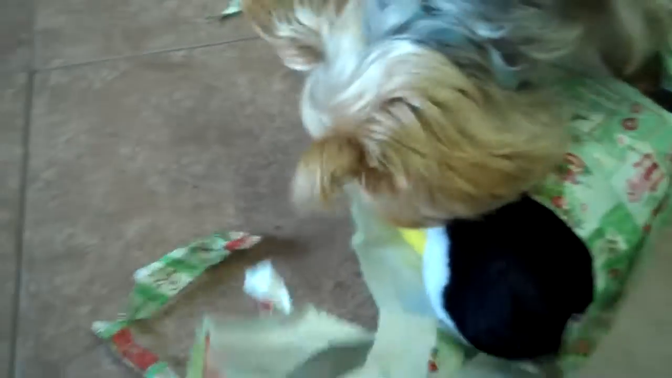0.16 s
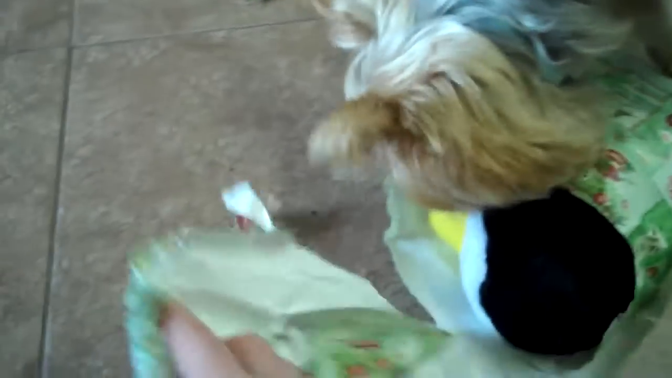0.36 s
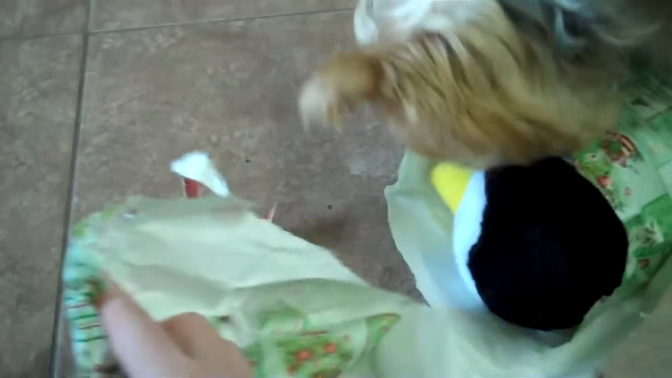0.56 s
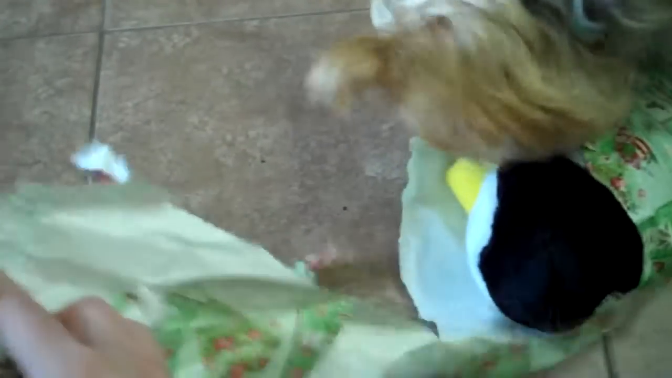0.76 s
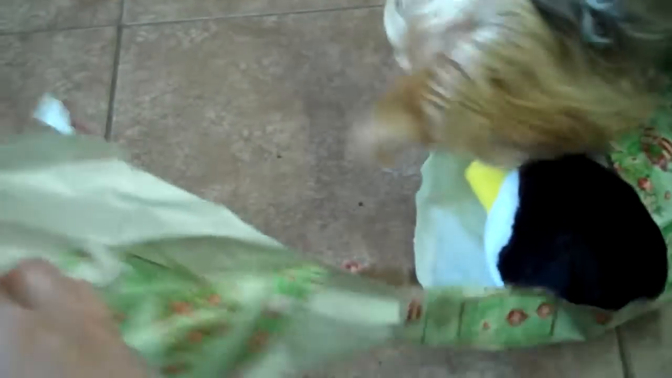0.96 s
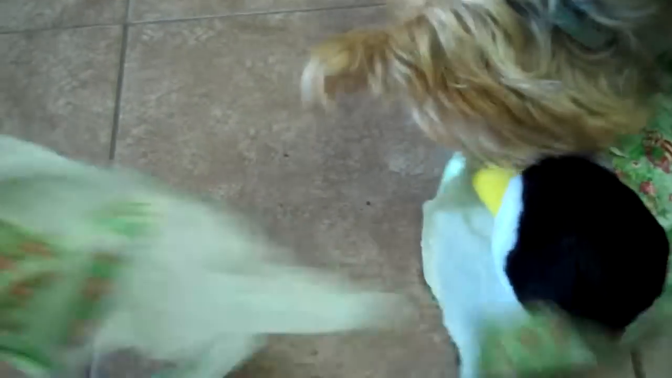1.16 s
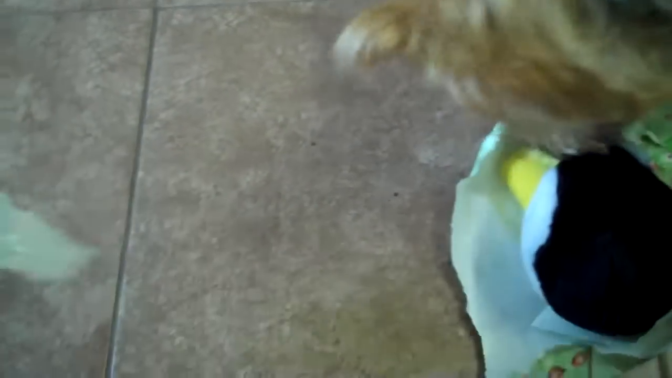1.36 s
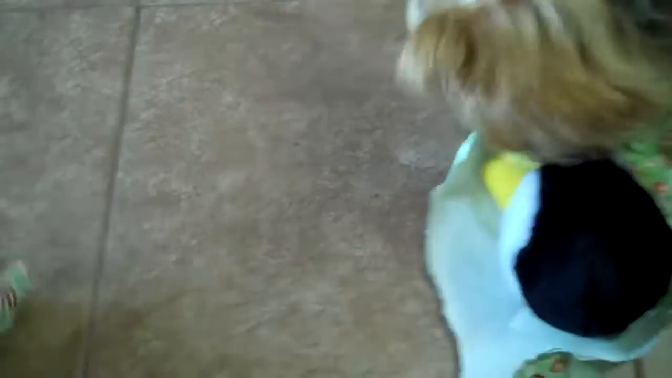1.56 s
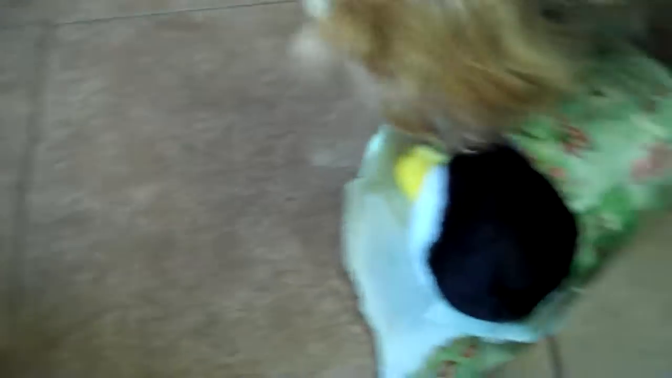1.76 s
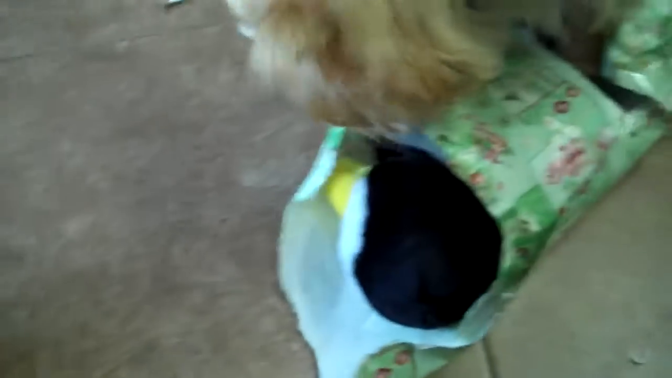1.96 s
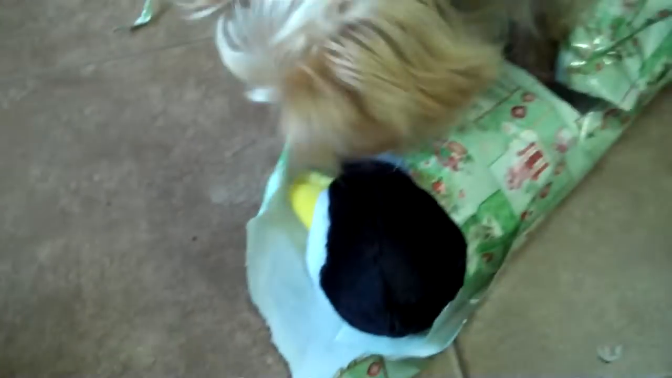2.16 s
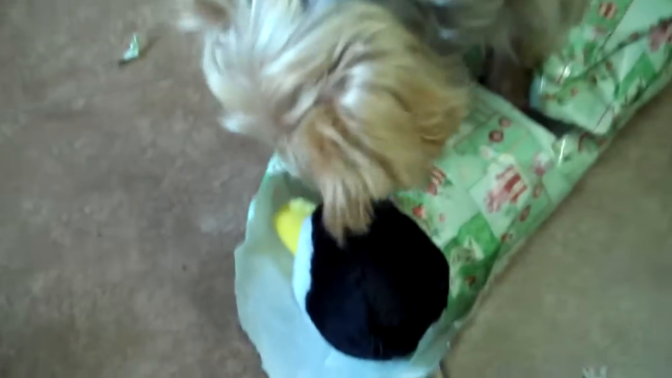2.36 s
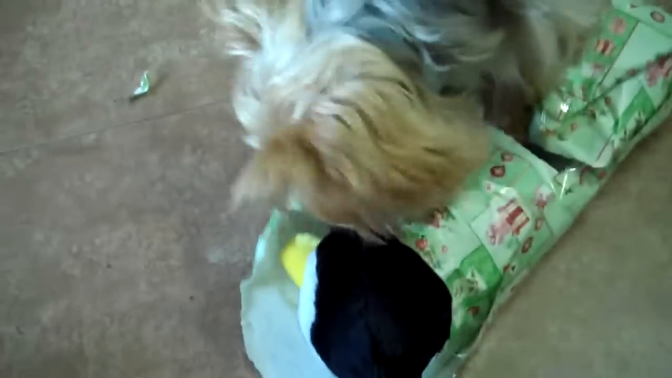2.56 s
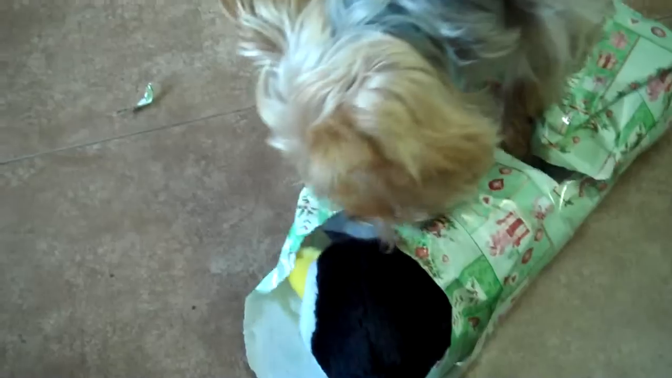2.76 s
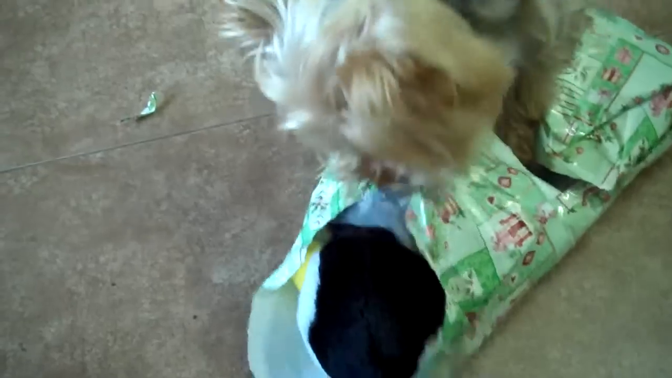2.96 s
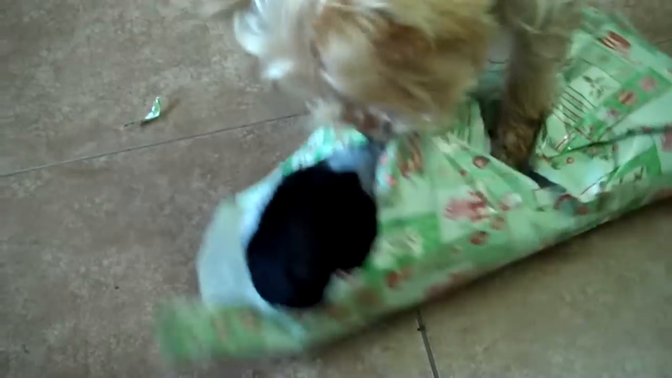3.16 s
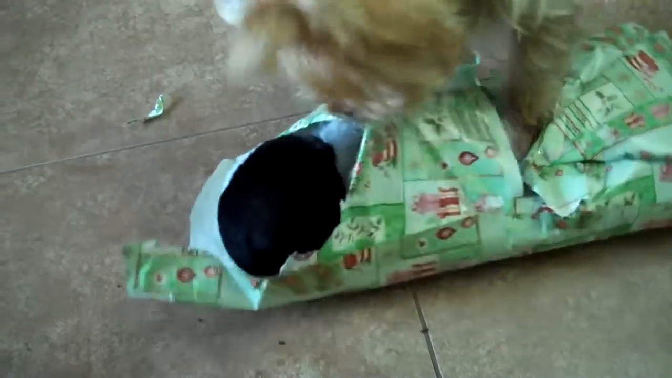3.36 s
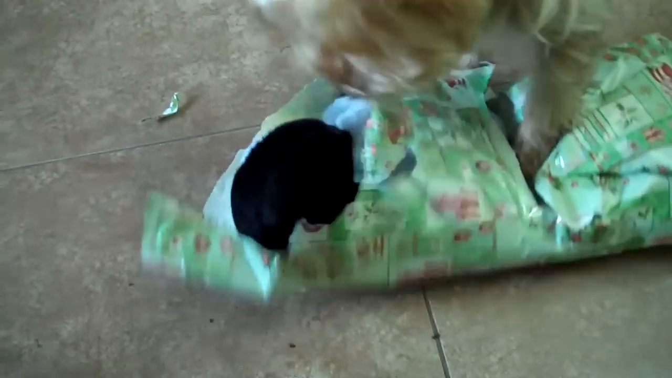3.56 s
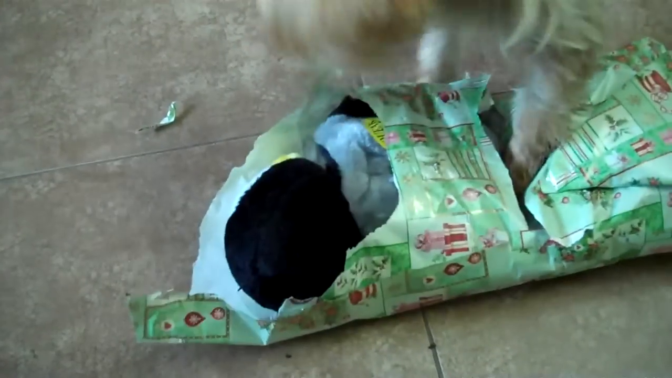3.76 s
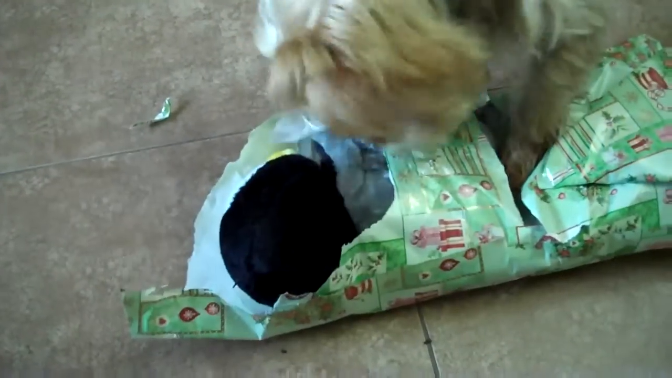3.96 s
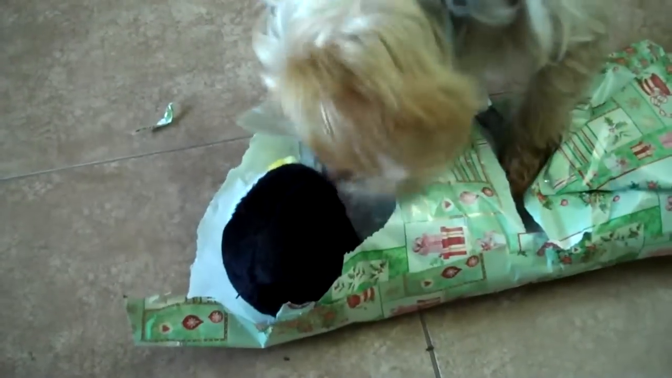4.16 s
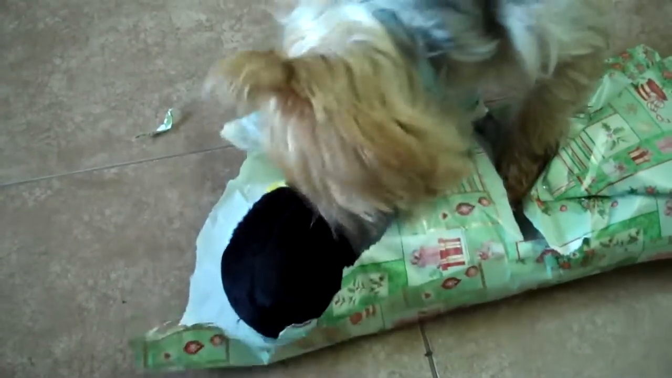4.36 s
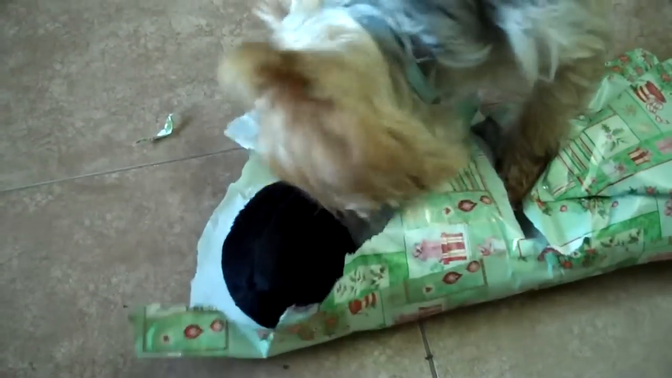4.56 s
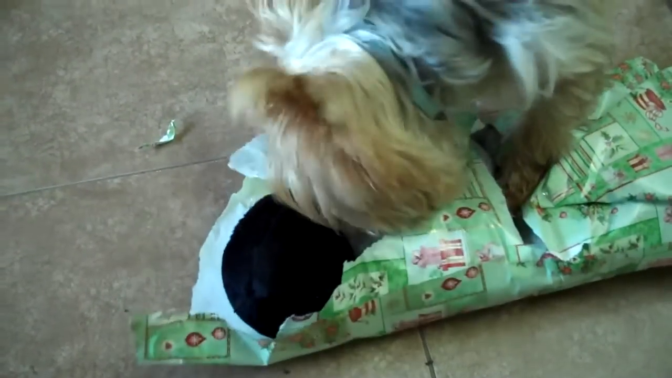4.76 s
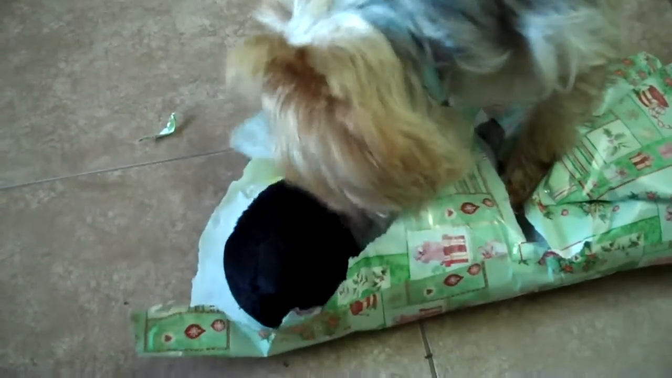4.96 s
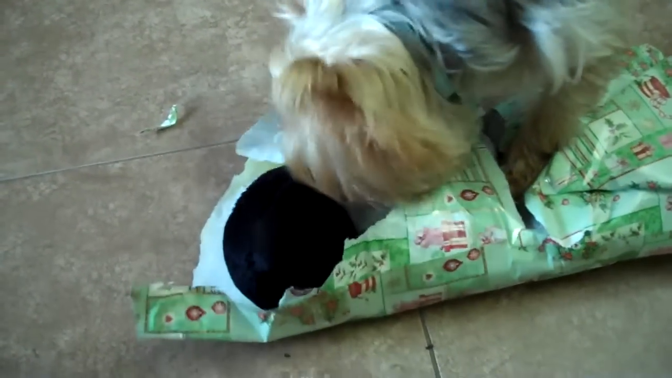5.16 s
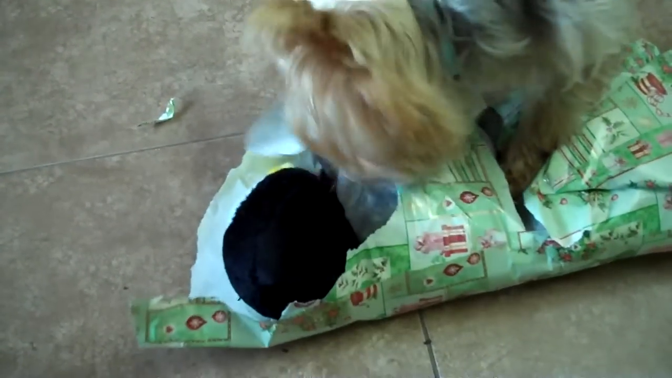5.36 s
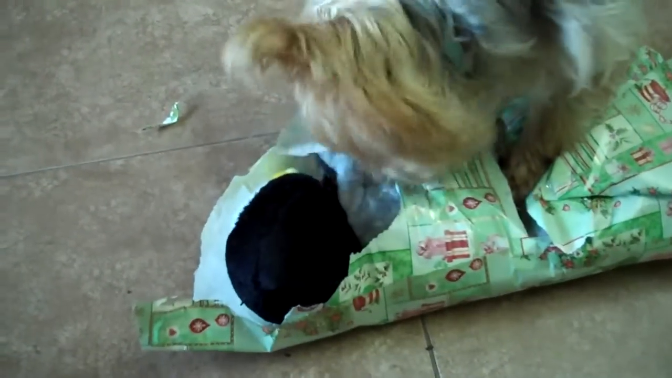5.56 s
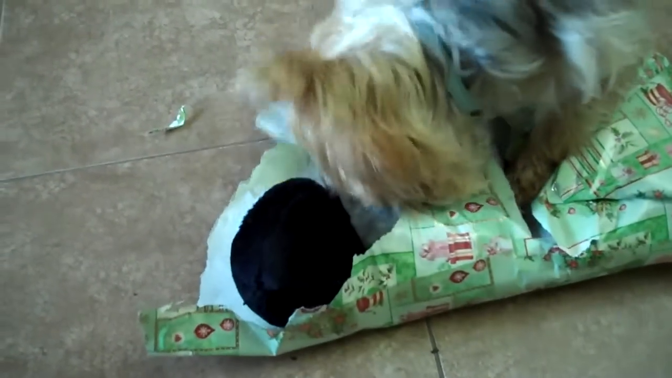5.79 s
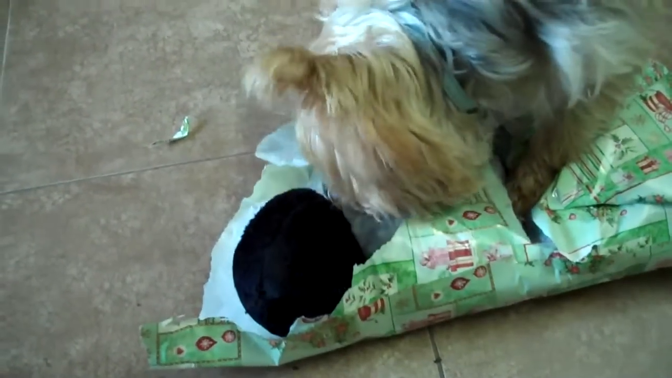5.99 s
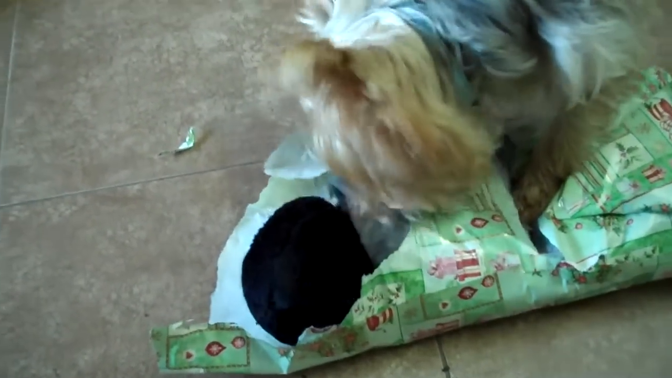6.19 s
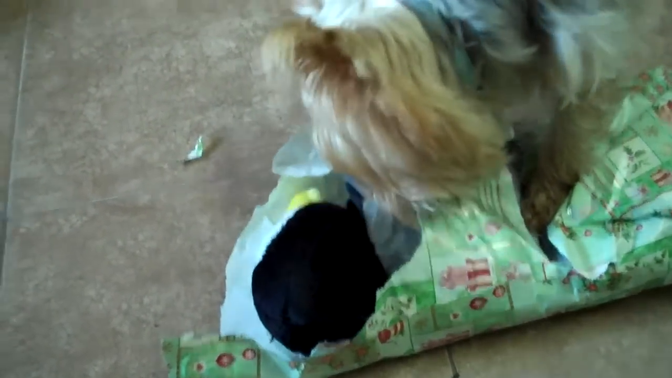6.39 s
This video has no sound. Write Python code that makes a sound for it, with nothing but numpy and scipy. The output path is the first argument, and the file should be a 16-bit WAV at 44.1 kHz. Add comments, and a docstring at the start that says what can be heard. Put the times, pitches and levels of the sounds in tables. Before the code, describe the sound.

Close, crisp gift paper is torn in sharp jerky bursts on a tiled floor, with a quiet lull, a second hard tear, and sparse faint rustling.

```python
"""Crisp paper crackles, hisses and snaps in hard pulls, fainter rustles, hard pulls again near 3.5 s,
then faint rustles, in a tiled room. A small dog and a hand pull wrapping paper off a toy, close to the
two microphones of a phone. Short noise bursts make the buckling creases, patchy noise the sliding
sheet, louder bursts the snaps. Decaying noise gives the room's answer and steady noise its tone;
the overall colour peaks near 7.5 kHz and closes above 14 kHz."""
import sys
import numpy as np
from scipy import signal
from scipy.fft import rfft, irfft, next_fast_len
from scipy.io import wavfile
from scipy.ndimage import uniform_filter1d, map_coordinates

SR = 44100
rng = np.random.default_rng(int(sys.argv[2]) if len(sys.argv) > 2 else 0)


def put_to_file(sound):
    """Save the sound as 16-bit audio at rate SR, in the file named by the first command-line argument."""
    columns = np.atleast_2d(sound).T  # one column per channel
    safe = np.clip(columns, -1, 1)
    whole_steps = np.round(safe * 32767)
    wavfile.write(sys.argv[1], SR, whole_steps.astype(np.int16))


N = 283557

# overall colour of the sound as picked up, peaking near 7.5 kHz and closing above 14 kHz: f/Hz, gain/dB
OVERALL_COLOUR = [(35, -41), (60, -42.5), (180, -25.5), (312, -16), (656, -15.5), (1320, -14),
                  (2300, -10.5), (3400, -11), (5000, -10), (6300, -6.5), (7510, 1), (8830, -14.5),
                  (14050, -29.5), (14400, -38), (15500, -76)]
# left-right likeness of the sliding paper and of the room's answer: f/Hz, likeness (1 = same in both)
PAPER_ALIKE = [(60, 1), (240, 1), (950, 0.87), (3770, 0.12), (15000, 0.92)]


def crinkle():
    """Swarms of small buckles over the hiss of paper sliding on paper and tile."""
    # the sheet parts in one even rip: from/s, to/s
    even_rips = [(1.075, 1.32), (3.415, 3.52)]
    swarm_count = 5200
    folds_hz, slack_hz = 3300, 1270  # folds sound under the first edge, slack areas under the second
    level_db, fold_db, slack_db = pulling()
    # lift both ahead of the overall colour, which favours the treble
    fold_db, slack_db = fold_db + 3.5, slack_db + 14.5

    # buckles crowd together where the density is high
    density = np.cumsum(amp(4 * wobble(45)))
    luck = rng.random((swarm_count, 3))
    share = (np.arange(swarm_count) + luck[:, 0]) / swarm_count
    at = np.searchsorted(density, density[-1] * share).clip(0, N - 1)
    size_db = -3.5 * np.log(luck[:, 1] + 0.15)
    t60 = 0.0045 + 0.0079 * luck[:, 2]

    def shape_db(hz):
        folds = fold_db[at, None] * below(hz, folds_hz)
        return folds + (slack_db - fold_db)[at, None] * below(hz, slack_hz)

    swarm = buckles(at / SR, size_db, shape_db, t60, tint_db=7.5, rise=0.0013, size=256)
    # even out the swarm, so that the pull on the sheet sets how much energy it gives off
    power = uniform_filter1d(np.bincount(at, amp(2 * size_db), N), size=1200)
    swarm = swarm / np.sqrt(np.abs(uniform_filter1d(power, size=1200)) + 1e-6)

    noise = hiss(PAPER_ALIKE, patchy_db=5.5)
    middle = filtered(noise, lambda hz: below(hz, folds_hz))
    low = filtered(noise, lambda hz: below(hz, slack_hz))
    sliding = noise - middle + amp(fold_db) * (middle - low) + amp(slack_db) * low

    t = np.arange(N) / SR
    even = uniform_filter1d(sum(1. * (t > a) * (t < b) for a, b in even_rips), size=600)
    # a hard pull tears in jerks: the sheet sticks, then gives; an even rip is steadier
    jerks_db = np.clip(0.062 * (level_db + 66), .5, 4) * wobble(130) * (1 - 0.5 * even)
    swarm = swarm * amp(-5 * even)
    # the harder the pull, the more crackle and the less sliding; an even rip slides more
    slide_db = 5.5 - 0.027 * (level_db + 54) + 3 * even
    return amp(level_db + jerks_db) * (amp(-27.5) * swarm + amp(slide_db) * sliding)


def pulling():
    """Level and colour of the worked sheet: pulls build, hold and ease over a rustle, mixed by power."""
    # the sheet shifting under the dog between pulls, all relative: t/s, level/dB, folds/dB, slack areas/dB
    rustle = [(0, -40, 4, -20.5), (0.2, -36, -8, -18), (0.57, -38.5, -15, 4.5), (0.9, -32.5, -2, -8),
              (1.4, -44.5, 0, -10), (1.65, -53, 4.5, -10), (2.06, -52, -2, 1.5), (2.5, -59.5, 3.5, -7),
              (2.9, -44, -1.5, -1), (3.2, -39.5, -12, -10), (3.55, -40.5, 4.5, 2), (3.85, -43.5, 6, -10),
              (4.03, -59, -8, -2), (4.3, -58.5, -7, -1.5), (4.7, -46.5, -13, -10), (4.95, -54, -4, -6),
              (5.74, -61, -7, -3), (6.43, -56.5, 3, 6)]
    # each pull, levels relative: t/s, hold/s, level/dB, time to build 10 dB/s, time to ease 10 dB/s,
    # folds/dB, slack areas/dB; building and easing times under 4 ms count as 4 ms
    tugs = [(0.227, 0.021, -18, 0.02, 0.0372, -13, -23.5), (0.317, 0.024, -22, 0.01, -0.0051, -13.5, -22.5),
            (.415, 0.025, -22, 0.05, 0.06, 1, -17), (0.603, 0.024, -31.5, 0.05, -0.01, 0, -21),
            (0.648, 0.0099, -25, .015, 0.03, -2, -14), (0.724, 0.015, -20, -0.025, 0.0272, -3.5, -16.5),
            (0.785, 0.0091, -18.5, -0.02, 0.0168, -1.5, -20.5), (0.817, 0.011, -19, 0, 0.0233, -2, -17),
            (0.86, 0.021, -21.5, -0.01, 0.0123, -6, -16), (0.914, 0.011, -18.5, 0, 0.0342, -5, -20),
            (0.971, 0.0067, -21, -0.02, 0.0182, -10.5, -16), (1.003, 0.0089, -26.5, -0.15, 0.03, -8, -19.5),
            (1.077, 0.053, -20, -0.12, 0.0438, -9, -18), (1.149, 0.042, -17, 0.01, 0.0384, -9.5, -14),
            (1.222, 0.012, -14.5, 0.05, 0.0074, -18, -16.5), (1.268, 0.015, -20.5, 0.04, 0.0332, -14, -13),
            (1.349, 0.0031, -31.5, 0.1, 0.03, -13, -12), (1.477, 0.024, -35.5, 0.1, 0.03, -8.5, -16),
            (1.709, 0.022, -37, 0.04, 0.0649, -3, -7), (1.87, 0.033, -46.5, 0.8, -0.02, -10, -15),
            (1.951, 0.013, -43.5, 0, 0.05, 7, 4), (2.094, 0.0085, -47, -0.14, 0.07, 8, -7),
            (2.43, 0.02, -46.5, 0.15, 0.03, 5.5, -4.5), (2.637, 0.037, -48.5, 0.13, 0.27, -2, -5.5),
            (2.75, 0.035, -50, 0.6, -0.1, -21, -15), (3.135, 0.012, -37, -0.04, 0.1, 3, -9),
            (3.223, .005, -38, -0.01, 0.14, 5, -16), (3.258, 0.032, -30.5, 0.0046, 0.05, -3, -6.5),
            (3.36, 0.028, -32, 0, 0.0234, -3, -12), (3.427, 0.024, -18.5, 0.0064, 0.0345, 0, -8),
            (3.572, 0.082, -22.5, 0, 0.0077, -2.5, -7.5), (3.672, 0.062, -17, 0.0041, -0.011, -5.5, -9.5),
            (3.747, 0.044, -36, -0.01, 0.0572, -4, -8), (4.484, 0.0044, -35.5, 0.05, 0.03, 1.5, -10.5),
            (5.181, 0.024, -41.5, 0.06, 0, -9, -14.5), (5.26, 0.028, -43.5, 0.08, 0, -9, -7),
            (5.387, 0.014, -50, 0.23, 0.07, -2, -5.5), (5.458, 0.0088, -35.5, 0.05, -0.0241, -1.5, -13.5),
            (5.552, 0.0062, -46, 0.09, 0.05, -1, -2), (5.627, 0.034, -45, 0, -0.15, -9, -14),
            (5.819, 0.092, -47.5, -0.04, -0.23, -12, -9.5), (5.965, 0.02, -42, 0.06, 0.02, -2.5, -7),
            (6.1, 0.0044, -43, 0.05, 0, 1, -5.5), (6.276, 0.033, -39, -0.0539, 0, -7, -8),
            (6.355, 0.053, -44, 0, 0.2, -8, -11)]
    t = np.arange(N) / SR
    level_db, rustle_fold_db, rustle_slack_db = curves(rustle)
    power = amp(2 * level_db)
    fold, slack = power * rustle_fold_db, power * rustle_slack_db
    for s, hold, db, build, ease, fold_db, slack_db in tugs:
        before = (s - t) / max(build, .004)
        after = (t - s - hold) / max(ease, .004)
        away = np.maximum(before, after).clip(0)
        tug = amp(2 * (db - 10 * away))
        power = power + tug
        fold, slack = fold + tug * fold_db, slack + tug * slack_db
    # the strongest movement weighs most in the colour
    return 10 * np.log10(power), fold / power, slack / power


def snaps():
    """The loudest buckles, each with its own body; no crease is large enough for deep bass."""
    # single loud buckles, levels relative: t/s, level/dB, body/dB
    loud_buckles = [(0.0197, -23, -25), (0.07, -22, -7.5), (0.1228, -9, -26), (0.17, -15.5, -29),
                    (0.203, -9.5, -39), (0.225, -10, -12.5), (0.2439, -7, -22.5), (0.2684, -11, -29),
                    (0.2765, -11.5, -36), (0.2816, -15, -39), (0.2895, -20, -30), (0.311, -8, -47),
                    (0.318, -13.5, -40), (0.328, -14, -28), (0.343, -13, -26), (0.3508, -4, -29),
                    (0.3797, -6, -36), (0.409, -9.5, -23), (0.4176, -7.5, -14.5), (0.4871, -4, -21.5),
                    (0.5276, -11, -29), (0.59, -11.5, -11), (0.609, -12, -16), (0.623, -14.5, -16),
                    (0.677, -12.5, -16), (0.704, -17, -22), (0.7113, -21, -25), (0.7172, -12, -23),
                    (0.723, -7.5, -18), (0.726, -11, -36), (0.733, -7, -31), (0.739, -7, -37),
                    (0.7512, -8, -23), (0.756, -3, -58), (0.7647, -6, -26), (0.78, -4, -21),
                    (0.7861, -10, -16), (0.811, -16, -15), (0.8584, -10.5, -22), (0.8723, -13.5, -25),
                    (0.8848, -10.5, -20.5), (0.9181, -12, -24), (0.968, -10.5, -36), (0.976, -11.5, -21),
                    (1.0737, -11, -29), (1.091, -12, -20), (1.14, -12, -43), (1.226, -10.5, -24),
                    (1.259, -9.5, -35), (1.5896, -21.5, -32), (1.7068, -18, -5), (1.7148, -27, -16),
                    (1.7402, -25.5, -3), (1.7557, -28.5, -14), (1.8715, -31, -26), (1.89, -40, -20),
                    (1.901, -30, -10), (1.954, -26.5, -3), (1.977, -31, -17), (1.9855, -34, -21),
                    (2.086, -31, 8), (2.103, -28.5, -8), (2.1188, -31, -15), (2.3565, -20.5, -32),
                    (2.431, -28, -11), (2.6315, -27, -2), (2.6388, -32, -15), (2.6435, -29, -12),
                    (2.673, -32.5, 5), (2.753, -21.5, -17.5), (2.7585, -25, -30), (2.7797, -24, -3),
                    (2.7915, -16, -35), (2.829, -25, 26), (2.842, -28.5, 17), (2.8701, -27, -6),
                    (2.8885, -33, -3), (2.897, -25.5, 4), (2.922, -26, -20), (2.954, -24.5, -10),
                    (2.976, -29, 19), (2.98, -32, -5), (2.9935, -34, -24), (3.0471, -17, -21.5),
                    (3.128, -12, -11.5), (3.2299, -13, -16.5), (3.27, -20, -29), (3.3132, -19, -16),
                    (3.3582, -18, -8), (3.429, -13, -7), (3.4593, -14, -12), (3.562, -11, -21),
                    (3.581, -15, -19), (3.599, -15, -14), (3.628, -7.5, -22), (3.637, -5, -27),
                    (3.652, -16, -22), (3.666, -8, -17), (3.6932, -10, -21), (3.709, -10, -10),
                    (3.7373, -11.5, -14), (3.812, -20, -28), (4.3769, -26, -8), (4.4421, -28.5, -9),
                    (4.5567, -26, -30), (4.7506, -26, -14), (4.7532, -10, -21), (5.041, -32.5, -14),
                    (5.1667, -26, 13), (5.364, -35, -2), (5.394, -29, -20), (5.398, -28, -25),
                    (5.454, -23, -12), (5.5742, -27, -20), (5.82, -35.5, 18), (5.8906, -35, -32),
                    (6.0477, -27, -10), (6.092, -22.5, -8.5), (6.1018, -22.5, -7), (6.1534, -34.5, -15),
                    (6.246, -31, -9), (6.268, -25.5, -10), (6.2805, -24, -2), (6.289, -27, -4),
                    (6.321, -23, 0), (6.357, -33, -12), (6.3632, -25.5, -12), (6.381, -38, -15)]
    s, db, body_db = np.transpose(loud_buckles)
    typical_t60_s, scatter = 0.0064, .15
    growth = 0.017  # louder buckles last longer: log of t60 per dB
    t60 = typical_t60_s * np.exp(scatter * rng.standard_normal(len(s)) + growth * (db + 24.5))

    def shape_db(hz):
        body = (body_db[:, None] + 17) * below(hz, 2370)
        return body - 12 * below(hz, 520) - 20 * below(hz, 200)

    return amp(-11.5) * buckles(s, db, shape_db, t60, tint_db=2.5, rise=0.00032, size=1024)


def buckles(s, db, shape_db, t60, tint_db, rise, size):
    """Each buckle is a fast-decaying burst of noise with its own colour and place on the sheet."""
    lead = 16  # samples of room ahead of the onset for the filter's ringing
    draw = rng.standard_normal((len(s), size + 3))
    tint, lag, pan = draw[:, size:].T[..., None]
    t, hz = np.arange(size) / SR, np.fft.rfftfreq(size, 1 / SR)
    t60 = np.clip(t60, .001, .1)[:, None]
    burst = draw[:, :size] * amp(-60 * t / t60) * (1 - np.exp(-t / rise))
    # a crease of random size favours one region of pitch
    bump_db = tint_db * np.exp(-(np.log((hz + 1) / 3000) - 0.68 * tint) ** 2 / 0.078)
    sound = rfft(np.roll(burst, lead, axis=1)) * amp(shape_db(hz) + bump_db)
    # set the level as heard through the overall colour; longer buckles carry more energy
    heard = np.linalg.norm(sound * amp(along(OVERALL_COLOUR, hz)), axis=1, keepdims=True)
    sound = sound * amp(db[:, None]) * np.sqrt(t60 * SR * size) / heard
    # the path to the left microphone is usually a little longer, by these samples
    longer = 1.49 + 1.03 * lag
    right = amp(pan) * np.exp(2j * np.pi * hz * longer / SR)
    where = (np.round(s * SR).astype(int)[:, None] + np.arange(size)).ravel()
    pair = [np.bincount(where, irfft(z).ravel(), N + size) for z in (sound, sound * right)]
    return np.array(pair)[:, lead:N + lead]


def hiss(alike, patchy_db):
    """Stereo noise whose level drifts in random patches of time and frequency."""
    z = signal.stft(rng.standard_normal((2, N)), nperseg=256)[2]
    field = uniform_filter1d(rng.standard_normal(z.shape[1:]), size=4, axis=0)
    field = uniform_filter1d(field, size=7, axis=1)
    patches = signal.istft(z * amp(patchy_db * unit(field)), nperseg=256)[1][:, :N]
    return spread(unit(patches), alike)


def room(x):
    """The tiled room's answer: a noise tail in which each frequency dies at its own speed."""
    # decay between the tiles: f/Hz, t60/s
    tile_decay = [(300, 0.36), (10000, 0.042)]
    hz, t, z = signal.stft(rng.standard_normal((2, SR // 2)), SR, nperseg=256)
    decay = amp(-60 * t / along(tile_decay, hz)[:, None])
    tail = signal.istft(z * decay, SR, nperseg=256)[1]
    late = np.pad(x.mean(axis=0), (200, 0))[None]  # the tail starts 200 samples late
    wet = signal.fftconvolve(late, tail / np.linalg.norm(tail[0]), axes=1)[:, :N]
    return spread(wet, PAPER_ALIKE)


def room_tone():
    """The quiet murmur of air and appliances: coloured noise with a slowly wavering level."""
    # colour ahead of the overall colour: f/Hz, relative level/dB
    air_colour = [(25, 50), (100, 29.5), (280, 15.5), (1000, 14), (2200, 5.5), (7400, 5.5), (13500, 12.5)]
    # left-right likeness: f/Hz, likeness (1 = same in both)
    air_alike = [(60, 0.11), (240, 0.75), (950, 0.41), (3770, 0.12), (15000, 0.07)]
    noise = hiss(air_alike, patchy_db=4.0)
    level = amp(-47.5 + 0.27 * wobble(3.65))
    return level * filtered(noise, lambda hz: amp(along(air_colour, hz)))


def spread(pair, alike):
    """Two unrelated sounds mixed into left and right, as alike as close microphones hear them."""
    def turn(hz):
        return np.arccos(np.clip(along(alike, hz), -1, 1)) / 2

    mid, side = filtered(pair, lambda hz: np.array([np.cos(turn(hz)), np.sin(turn(hz))]))
    return np.array([mid + side, mid - side])


def below(hz, edge_hz):
    """The share of sound under an edge: the larger the moving area of the sheet, the lower it sounds."""
    return 1 / (1 + (hz / edge_hz) ** 4)


def amp(db):
    """Decibels to a linear factor."""
    return 10 ** (np.asarray(db) / 20)


def unit(x):
    """The signal scaled to an RMS of one."""
    return x / np.sqrt(np.mean(x ** 2) + 1e-20)


def along(points, hz):
    """(Hz, value) points read on a log frequency axis."""
    f, v = np.transpose(points)
    return np.interp(np.log(hz + 1), np.log(f + 1), v)


def curves(rows):
    """One value per sample for each column after the time."""
    s, *cols = np.transpose(rows)
    return [np.interp(np.arange(N) / SR, s, c) for c in cols]


def wobble(rate):
    """A smooth random curve with this many knots a second."""
    knots = rng.standard_normal(int(N * rate / SR) + 4)
    return map_coordinates(knots, [np.arange(N) * rate / SR])


def filtered(x, response):
    """The sound shaped by a response over frequency, padded so that tails do not wrap round."""
    m = 2 * next_fast_len(N // 2 + SR // 4)
    return irfft(rfft(x, m) * response(np.fft.rfftfreq(m, 1 / SR)), m)[..., :N]


def causal(gain_db):
    """The minimum-phase response with this gain: it rings only after the sound."""
    c = irfft(gain_db * np.log(10) / 20)
    c[1:len(c) // 2] *= 2
    c[len(c) // 2 + 1:] = 0
    return np.exp(rfft(c))


def scene():
    """Paper near by, its echo and the room tone."""
    paper = crinkle() + snaps()
    return paper + amp(-11.0) * room(paper) + room_tone()


def record(dry):
    """The overall colour, with the right shaded in the treble; soft clipping, a bass cut and a band limit."""
    # the phone's body shades the right microphone: f/Hz, left minus right/dB
    body_shadow = [(60, 1), (240, -1), (950, -0.5), (3770, 1.5), (15000, 7.0)]
    top_hz = 15574

    def coloured_pair(hz):
        return causal(along(OVERALL_COLOUR, hz)) * amp(np.outer([.5, -.5], along(body_shadow, hz)))

    x = filtered(dry, coloured_pair)
    x = x / (1 + np.abs(x) ** 8) ** (1 / 8)  # bends only near full scale
    return filtered(x, lambda hz: (hz < top_hz) * (1 - 0.9 * below(hz, 62)))


dry = scene()
out = record(dry)
put_to_file(out)
```